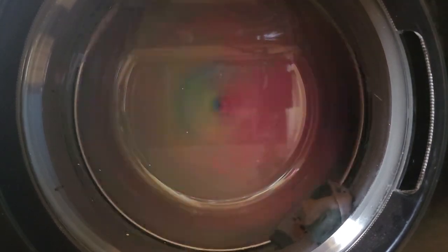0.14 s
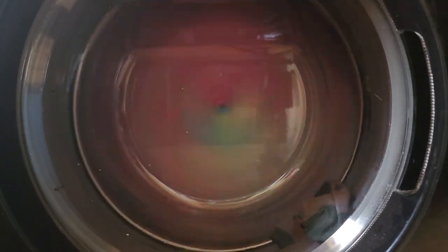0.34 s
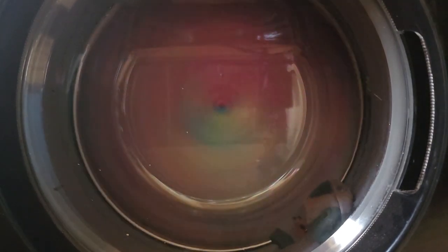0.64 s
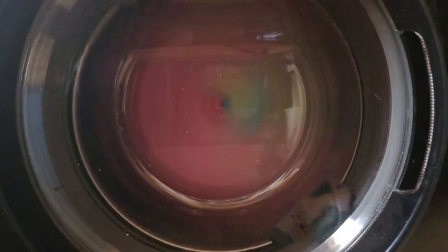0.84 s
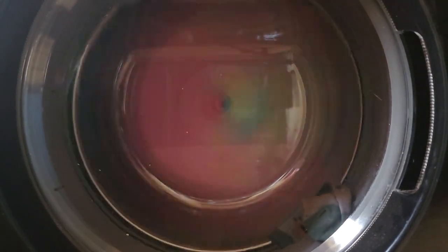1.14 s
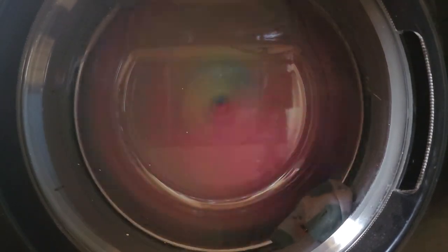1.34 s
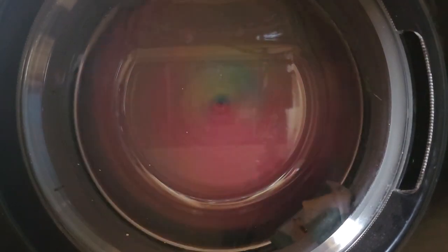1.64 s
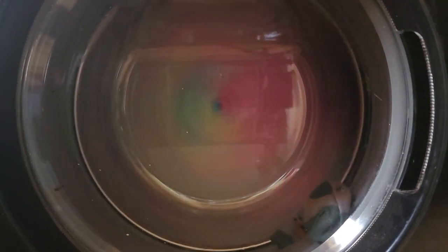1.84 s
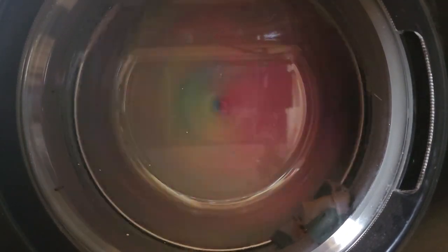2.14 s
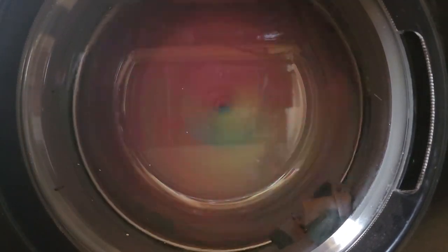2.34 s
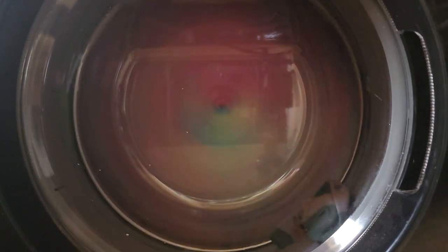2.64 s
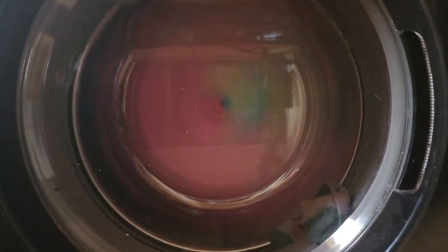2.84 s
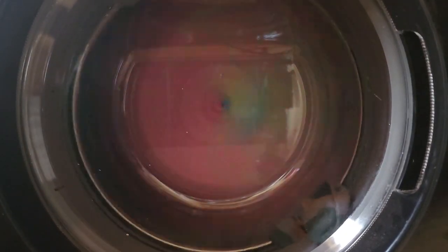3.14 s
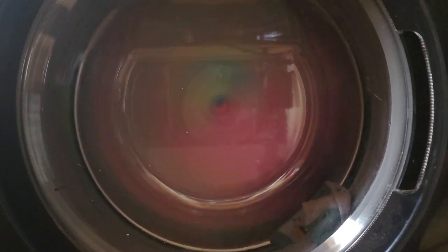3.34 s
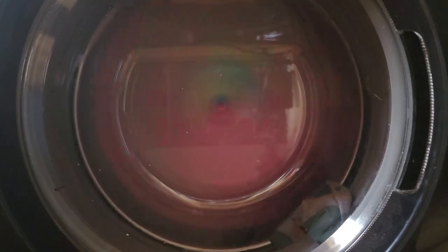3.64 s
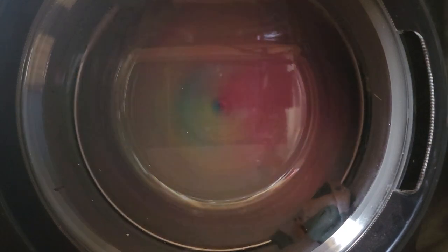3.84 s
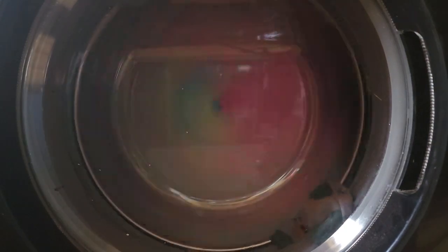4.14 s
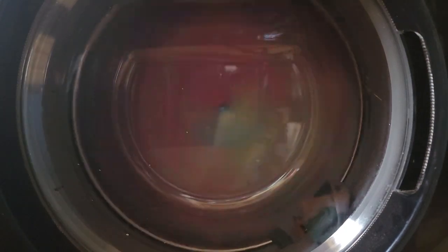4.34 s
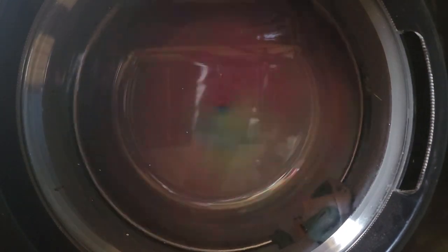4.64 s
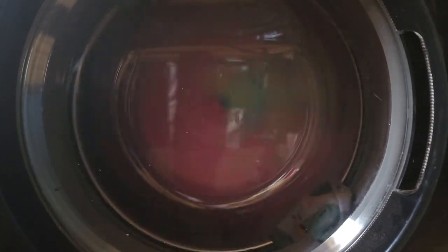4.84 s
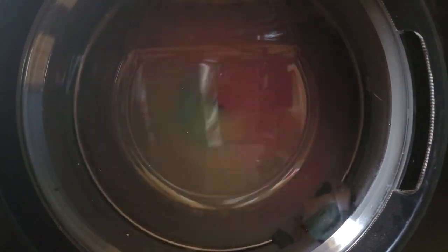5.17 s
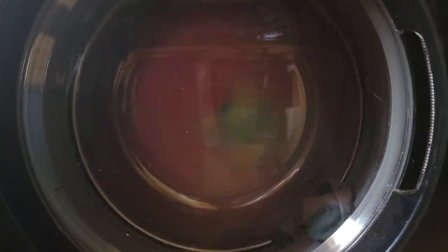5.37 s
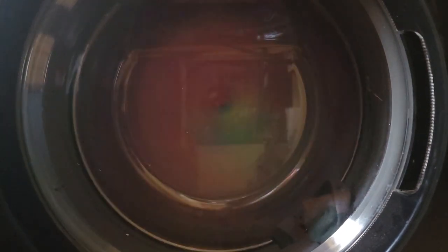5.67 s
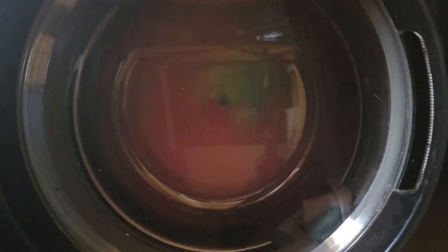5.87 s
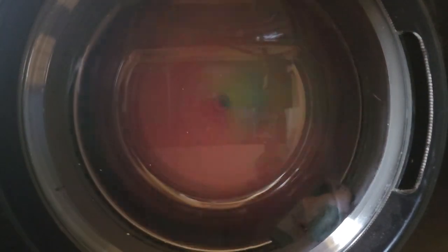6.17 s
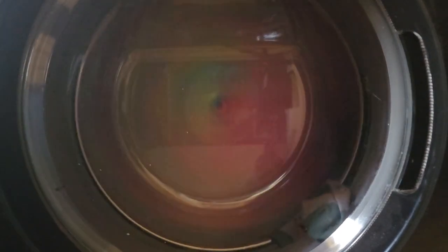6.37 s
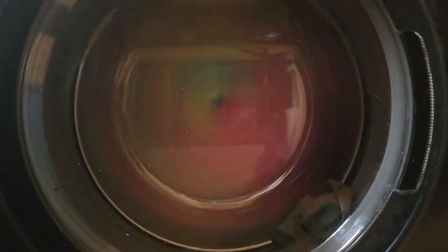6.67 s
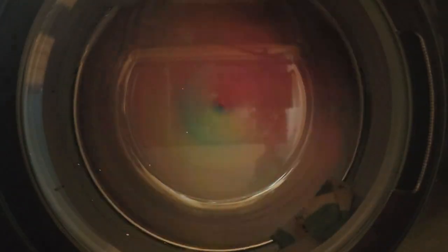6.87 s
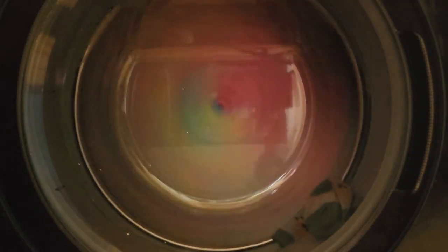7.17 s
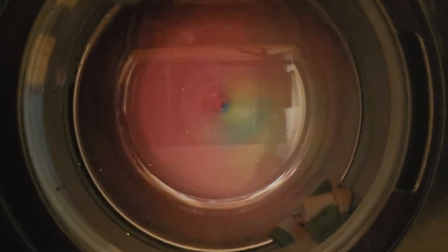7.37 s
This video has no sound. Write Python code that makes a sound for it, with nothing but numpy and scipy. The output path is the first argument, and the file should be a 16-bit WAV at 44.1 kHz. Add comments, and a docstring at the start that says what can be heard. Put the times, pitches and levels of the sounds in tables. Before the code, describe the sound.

Close up, a washing machine on full spin drones low and loud, with fainter grinding, buzzing and a high pulsing whine.

```python
"""The cabinet of a front-loading washing machine throbs at top spin, heard close to the door.
The unbalanced load forces it once a turn, and a resonance near the seventh harmonic gives a deep hum.
Rolling contact in the worn drum bearing excites the tub and panels, which grind and howl.
Behind these, the belt-driven motor adds the hiss and buzz of its sliding brushes
and the thin, pulsing whine of its commutator."""
import sys
import numpy as np
from scipy import signal
from scipy.fft import rfft, irfft
from scipy.io import wavfile

SR = 44100
rng = np.random.default_rng(int(sys.argv[2]) if len(sys.argv) > 2 else 0)


def transcribe(signal):
    """Save signal, clipped to [-1, 1], as a 16-bit WAV file at the path in sys.argv[1]."""
    frames = np.atleast_2d(signal).T
    limited = np.clip(frames, -1, 1)
    pcm = np.round(limited * 32767).astype(np.int16)
    wavfile.write(sys.argv[1], SR, pcm)


N = 331191
TIME = np.arange(N) / SR

DRUM_HZ, MOTOR_HZ = 16.5192, 192.56  # rates of rotation
OUTER_RACE_HZ, INNER_RACE_HZ = 59.93, 88.75  # ball-pass frequencies
BOOM_HZ, BOOM_WIDTH_HZ, BOOM_GAIN = 115.4, 4.5, 6  # the cabinet's main resonance
COMMUTATOR_BARS = 18

# Likeness of the sound at the two microphones: f/Hz, correlation
COHERENCE = [(30, -0.5), (150, 0.46), (300, 0.96), (600, 0.65), (1200, 0.5), (2500, 0.3), (5000, -0.05),
             (15000, -0.2)]
# Left minus right: f/Hz, level difference/dB
BALANCE = [(100, 1.9), (400, 1.3), (600, 1), (950, 3.5), (1300, 0.5), (3000, 1.9), (6500, 0), (8600, 5.5),
           (9500, -4), (11500, -3), (13000, 2), (15500, 3)]
# Commutator harmonics: left level/dB, right level/dB, throb depth, throb phase/turns, half-turn depth
WHINE_TONES = [(-39.2, -37, 0.18, 0.9, 0.23), (-34.5, -41.5, 0.04, 0.77, 0.18), (-41, -36, 0.08, 0.4, 0.22),
               (-38.8, -54, 0.2, 0.56, 0.12)]
# Response of each commutator harmonic to the treble level: slope/(dB per dB)
WHINE_SLOPES = [0.38, 0.62, 1.1, 1.1]
# Random fading of the whine, stronger later on: t/s, depth/dB
WHINE_FADING = [(2.5, -0.1), (4.5, 0.5)]
# Swells and sags of single whine tones: t/s, harmonic number, half-width/s, lift/dB
WHINE_SWELLS = [(2.4, 3, .7, 2.5), (2.97, 1, 0.083, 4.5), (3.22, 1, .1, 3), (3.62, 3, 0.13, 3.2),
                (3.97, 1, .07, 4), (4.2, 3, 0.57, 2.5), (4.77, 1, .15, 8), (5.13, 1, .07, -2),
                (5.333, 1, .07, 6), (5.5, 4, .6, -3), (5.945, 1, 0.26, 5), (6.25, 2, 0.34, 2),
                (6.354, 1, .05, 2.5), (6.42, 4, .14, 2.5), (6.645, 1, .07, 6.5), (7.48, 1, 0.13, 4.5)]
# Level of the treble, which hiss, buzz and whine follow; it eases after about 4 s: t/s, relative level/dB
TREBLE_LEVEL = [(0, -42.8), (3.6, -43), (4.4, -44.4), (7.5, -44.5)]
# Prominent harmonics of the motor shaft: harmonic number, left level/dB, right level/dB
SHAFT_TONES = [(17, -47.4, -50.6), (19, -59, -57), (20, -43.6, -51), (22, -46.6, -61), (23, -57, -51.6),
               (24, -67, -65), (25, -46.6, -82), (26, -48, -60), (27, -64, -50), (28, -49, -66),
               (32, -51, -73), (33, -54, -60), (34, -45, -47), (35, -63.4, -48), (37, -53, -44.5),
               (38, -46.5, -44.5), (39, -51, -45), (40, -55, -60), (41, -53, -53), (43, -58, -62),
               (44, -45.5, -58), (46, -50.6, -55), (49, -56.6, -50.9), (55, -46, -75), (59, -46, -50.5),
               (62, -59, -47), (63, -62, -64), (64, -47, -57)]
# Envelope of the other shaft harmonics: f/Hz, level/dB
SHAFT_ENVELOPE = [(2500, -42), (4000, -53), (6000, -59), (9500, -90), (12000, -63), (15500, -59.5)]
# Broadband rush of bearing, air and brushes: f/Hz, spectral density level/dB
RUSH_SPECTRUM = [(20, -70), (50, -78), (100, -55), (200, -63), (350, -55.5), (530, -64.5), (750, -58),
                 (1100, -53.5), (1650, -62.5), (2400, -68.5), (4000, -78), (7000, -80), (9700, -82.5),
                 (15500, -76)]
# Resonances of tub and panels: f/Hz, bandwidth/Hz, lift/dB
PANEL_MODES = [(270.8, 14.7, 7), (442, 27, 8.5), (603.4, 29, 6.5), (969, 95, 5.5), (1170, 30, 8),
               (1314, 32, 10.5), (1477, 59, 12), (1835, 134, 8.5), (1950, 120, 3), (2174, 133, 10),
               (2559, 48, 10), (2990, 230, 3.5), (3400, 600, 7), (7550, 2400, 5)]
# Grinding of the bearing, which its tones, rush and howl follow: t/s, relative level/dB
GRINDING_LEVEL = [(0, -19), (1.5, -18.5), (4.2, -19.0), (4.8, -21), (5.45, -19), (7.5, -20)]
# Brief flares of the bearing: t/s, grinding lift/dB, howl lift/dB
BEARING_FLARES = [(0.079, 1.5, 5), (0.69, 1, 2), (1.54, 2.5, 1), (1.89, 0, 11), (2.82, 1.5, 7),
                  (3.18, 0, 8), (3.84, 2.5, 0), (4.07, -1, 12.5), (5.89, 1, 3), (6.19, 1.5, 11),
                  (6.43, -0.5, 6.5)]
# Tones of the drum bearing: f/Hz, left level/dB, right level/dB
BEARING_TONES = [(851.9, -34.5, -37.6), (890.3, -36.1, -36.2), (1018.8, -41.0, -37.1),
                 (1051.1, -36.6, -49.5), (1081.4, -34.2, -45.0), (1090.8, -41.4, -37.8),
                 (1121.7, -34.1, -38.3), (1138.6, -35.1, -38.4), (1154.0, -33.8, -29.1),
                 (1165.5, -36.6, -52.1), (1198.5, -43.0, -39.0), (1226.0, -36.8, -39.3),
                 (1242.2, -35.9, -34.8), (1258.3, -40.8, -40.9), (1291.3, -42.6, -45.3),
                 (1301.4, -34.2, -31.4), (1314.9, -38.0, -40.9), (1318.2, -43.1, -33.6),
                 (1331.0, -34.4, -36.9), (1347.8, -36.1, -40.2), (1419.8, -38.1, -41.7),
                 (1436.7, -37.4, -45.0), (1464.9, -39.5, -40.3), (1497.9, -32.7, -39.5),
                 (1508.7, -33.1, -40.3), (1525.5, -37.8, -34.9), (1763.7, -44.2, -42.0),
                 (1797.3, -40.7, -46.9), (1841.1, -42.9, -40.8), (1857.2, -37.4, -42.1),
                 (1880.1, -44.9, -46.7), (1960.9, -43.3, -44.3), (1968.9, -45.2, -45.7),
                 (2020.8, -44.6, -50.8), (2207.8, -43.3, -54.6), (2218.6, -45.5, -49.5)]
# Low resonances of the sprung tub and the cabinet: f/Hz, bandwidth/Hz
SUSPENSION_MODES = [(24, 3.3), (58, 2.5), (75, 2.4)]
# Slight rise and fall of the hum: t/s, relative level/dB
HUM_LEVEL = [(0, -13), (0.75, -13), (2.35, -13), (3.8, -12.6), (4.4, -13), (5.55, -13), (6.1, -13),
             (6.65, -13.5), (7.5, -13)]
# Cabinet vibration at 1, 2, 3, ... times the drum frequency: level/dB
HUM_HARMONICS = [-49.7, -39.7, -36, -33.9, -35.1, -29.9, -13.8, -36.9, -31.2, -44, -40, -43, -41, -45, -45,
                 -46, -47, -49, -41, -50, -49, -45, -42, -46, -47, -54, -42, -52, -47]


def amp(db):
    """Amplitude ratio of a level in decibels."""
    return 10 ** (np.asarray(db) / 20)


def unit_rms(x):
    """Normalisation to a mean square of 1."""
    return x / np.sqrt(np.mean(np.abs(x) ** 2) + 1e-20)


def spectrum_at(points, hz):
    """Interpolation of a spectrum on a logarithmic frequency axis."""
    f, value = np.transpose(points)
    return np.interp(np.log(hz + 1), np.log(f + 1), value)


def envelope(table):
    """Amplitude envelope of rms 1 from a curve of level against time."""
    return unit_rms(amp(np.interp(TIME, *np.transpose(table))))


def bump(centre_s, half_s):
    """Gaussian pulse of height 1."""
    return np.exp(-((TIME - centre_s) / half_s) ** 2)


def wander(cutoff_hz):
    """Random modulation: low-pass noise of rms 1."""
    steps = np.linspace(0, N / SR, 2048)
    hz = np.fft.rfftfreq(len(steps), steps[1])
    slow = irfft(rfft(rng.standard_normal(len(steps))) / (1 + (hz / cutoff_hz) ** 4))
    return np.interp(TIME, steps, unit_rms(slow))


def stereo_phasors(hz):
    """Partial coherence: random left and right phases that agree best in the low midrange."""
    spread = np.sqrt(-2 * np.log(np.clip(spectrum_at(COHERENCE, hz), .01, 1)))
    common = 2 * np.pi * rng.random(len(hz))
    difference = spread * rng.standard_normal(len(hz))
    return np.exp(1j * (common + np.outer([0, 1], difference)))


def stereo_gains(hz):
    """Level difference between the microphones, favouring the left at most frequencies."""
    return amp(np.outer([.5, -.5], spectrum_at(BALANCE, hz)))


def periodic(turns, harmonics, size=8192):
    """Fourier synthesis of a wave that repeats every turn, from complex rms amplitudes."""
    shape = irfft(np.r_[0, harmonics], size) * size / np.sqrt(2)
    return np.interp(turns % 1 * size, np.arange(size + 1), np.r_[shape, shape[0]])


def throb(drum, depth, phase_turns, half_turn_depth=0):
    """Amplitude modulation at once and twice the drum frequency."""
    angle = 2 * np.pi * (drum - phase_turns)
    return unit_rms(1 + depth * np.cos(angle) + half_turn_depth * np.cos(2 * angle))


def commutator_whine(drum, motor, treble_level, flutter=0.21, flutter_hz=22, doppler_rad=0.13, fade_hz=4.1):
    """Periodic contact of bars and brushes gives four high harmonics, which throb with the drum."""
    out = np.zeros((2, N))
    fade_db = np.interp(TIME, *np.transpose(WHINE_FADING))
    surge = throb(drum, depth=0.38, phase_turns=0.66)  # the swells, too, pulse with the drum
    for k, (left_db, right_db, *throb_shape) in enumerate(WHINE_TONES, 1):
        angle = 2 * np.pi * COMMUTATOR_BARS * k * motor
        swell_db = sum(db * bump(t, half_s) for t, number, half_s, db in WHINE_SWELLS if number == k)
        size = throb(drum, *throb_shape) * treble_level ** WHINE_SLOPES[k - 1] * amp(swell_db * surge)
        for side, db in enumerate([left_db, right_db]):
            # Doppler effect: the motor rocks towards one microphone and away from the other
            path_rad = side * np.pi / 2 + (2 * side - 1) * doppler_rad * k * np.cos(2 * np.pi * drum)
            tone = np.sin(angle + path_rad + flutter * wander(flutter_hz))
            fade = amp(fade_db * wander(fade_hz))
            flicker = 1 + flutter * wander(flutter_hz)
            out[side] += amp(db) * unit_rms(size * fade * tone * flicker)
    return out


def brush_buzz(drum, motor, treble_level, sway=0.57, half_sway=0.2, shiver=0.56, shiver_hz=17, gain_db=-1.76):
    """Brush chatter repeats each shaft turn: a harmonic series, modulated as the tub rocks."""
    hz = MOTOR_HZ * np.arange(1, 82)
    heights = amp(spectrum_at(SHAFT_ENVELOPE, hz)) * stereo_gains(hz) * (hz > 2500)
    for number, left_db, right_db in SHAFT_TONES:
        heights[:, round(number) - 1] = amp([left_db, right_db])
    heights[:, COMMUTATOR_BARS - 1::COMMUTATOR_BARS] = 0  # these harmonics belong to the whine
    angle = 2 * np.pi * drum
    weights = [np.ones(N), sway * np.cos(angle), sway * np.sin(angle),
               half_sway * np.cos(2 * angle), shiver * wander(shiver_hz)]
    out = np.zeros((2, N))
    for weight in weights:  # each has its own phases, so interference shifts the timbre
        out += weight * np.array([periodic(motor, h) for h in heights * stereo_phasors(hz)])
    weight_rms = np.sqrt(np.square(weights).sum(0).mean())
    return amp(gain_db) * out / weight_rms * treble_level


def grinding_effort(flare_s=0.026, clump_db=0.66, clump_hz=12):
    """Envelope of the bearing's excitation: a slow course, brief flares and small random clumps."""
    flare_db = sum(db * bump(t, flare_s) for t, db, _ in BEARING_FLARES)
    return envelope(GRINDING_LEVEL) * amp(flare_db + clump_db * wander(clump_hz))


def rolling_force(drum, rate_hz, cutoff_hz=2600, scatter_db=4):
    """Periodic forcing by a bumpy track: a line spectrum lying above the harmonics of the hum."""
    hz = rate_hz * np.arange(1, 4000 // rate_hz)
    heights = stereo_phasors(hz) * unit_rms(amp(scatter_db * rng.standard_normal(len(hz))))
    heights *= np.sqrt(2 * rate_hz / SR)  # the power density of unit white noise
    band = (hz > len(HUM_HARMONICS) * DRUM_HZ) / (1 + (hz / cutoff_hz) ** 8)
    return np.array([periodic(drum * rate_hz / DRUM_HZ, h) for h in heights * band])


def friction_rush(drum, motor, effort, treble_level, outer_db=-9, inner_db=-6, tub_db=-7, scrape=0.33):
    """Source and filter: bearing roughness and brush friction excite the modes of tub and panels."""
    hz = np.fft.rfftfreq(N, 1 / SR)
    left, independent = rfft(rng.standard_normal((2, N)))
    coherence = np.clip(spectrum_at(COHERENCE, hz), 0, 1)
    right = coherence * left + np.sqrt(1 - coherence ** 2) * independent
    noise = irfft(np.array([left, right]), N)
    outer = amp(outer_db) * rolling_force(drum, OUTER_RACE_HZ)
    tub = amp(tub_db) * rolling_force(drum, DRUM_HZ)
    inner = amp(inner_db) * rolling_force(drum, INNER_RACE_HZ)
    # the bearing grinds harder as the heavy side of the load comes round
    force = noise + outer + tub + inner * throb(drum, depth=0.34, phase_turns=0.31)
    tub_band = 1 / (1 + (hz / 600) ** 4)  # here the tub booms on its own
    boom = tub_band * rfft(force * throb(drum, depth=0.39, phase_turns=0.8))
    grind = (1 - tub_band) * rfft(force * throb(drum, depth=0.08, phase_turns=0.38) * effort)
    # the brushes scrape in spurts on the high spots of the commutator
    high_spots = unit_rms(periodic(motor, [.3, 1j, 1, .5j]))
    spurts = unit_rms(np.maximum(1 + scrape * high_spots, 0))
    hiss = rfft(noise * spurts * treble_level * throb(drum, depth=0.081, phase_turns=0.81))
    bearing_band = 1 / (1 + (hz / 2800) ** 6)
    source = bearing_band * (boom + grind) + (1 - bearing_band) * hiss
    modes_db = sum(db / (1 + (2 * (hz - f) / width) ** 2) for f, width, db in PANEL_MODES)
    colour = amp(spectrum_at(RUSH_SPECTRUM, hz) + modes_db)
    return irfft(source * colour * stereo_gains(hz), N) * np.sqrt(SR / 2)


def tub_howl(levels_db=(-27, -33), rough=0.39, rough_hz=9, steepness=3.9, surge_db=1.5, surge_hz=3.6):
    """Resonance: the bearing drives one sharp tub mode, which fades as the grinding eases."""
    carrier = np.exp(2j * np.pi * 11 * INNER_RACE_HZ * TIME)
    roughness = 1 + rough * (wander(rough_hz) + 1j * wander(rough_hz))
    flare_db = sum(db * bump(t, half_s=0.029) for t, _, db in BEARING_FLARES)
    drive = envelope(GRINDING_LEVEL) ** steepness * amp(flare_db + surge_db * np.tanh(wander(surge_hz)))
    return np.outer(amp(levels_db), unit_rms((roughness * carrier).real * drive))


def bearing_tones(drum, effort, waver=0.22, waver_hz=2.6):
    """Rolling contact on worn races: tones that waver as the balls slip and surge with the load."""
    hz, *levels_db = np.transpose(BEARING_TONES)
    heights = amp(levels_db) * stereo_phasors(hz)
    out = np.zeros((2, N))
    for f, height in zip(hz, heights.T):
        angle = 2 * np.pi * f * drum / DRUM_HZ + waver * wander(waver_hz)
        size = np.sqrt(2) * unit_rms(1 + waver * wander(waver_hz))
        out += np.outer(height, size * np.exp(1j * angle)).real
    return out * effort * throb(drum, depth=0.12, phase_turns=0.36)


def cabinet_hum(drum, scatter_above_hz=175, right_delay_s=.00007, waver_db=0.36, waver_hz=2):
    """Forced vibration: the unbalanced load shakes the cabinet, which booms on the seventh harmonic."""
    hz = DRUM_HZ * np.arange(1, len(HUM_HARMONICS) + 1)
    # each low resonance delays what lies above it by half a cycle; the boom rings on after each push
    lag_rad = sum(np.pi / 2 + np.arctan(2 * (hz - f) / width) for f, width in SUSPENSION_MODES)
    lag_rad -= np.angle(1 + BOOM_GAIN / (1 + 2j * (hz - BOOM_HZ) / BOOM_WIDTH_HZ))
    # the many panel modes higher up scatter the phases
    phasors = np.where(hz < scatter_above_hz, 1j * np.exp(-1j * lag_rad), stereo_phasors(hz))
    travel = np.exp(-2j * np.pi * np.outer([0, right_delay_s], hz))
    heights = amp(HUM_HARMONICS) * phasors * stereo_gains(hz) * travel
    hum = np.array([periodic(drum, h) for h in heights])
    return hum * envelope(HUM_LEVEL) * amp(waver_db * wander(waver_hz))


def scene(drift=0.000145, drift_hz=0.267, belt_turns=0.0027):
    """Superposition of all sources; drum and motor are angles, in turns, coupled by the belt."""
    drifting_s = TIME + np.cumsum(drift * wander(drift_hz)) / SR
    drum = DRUM_HZ * drifting_s
    # the load tugs the belt once a turn, so the motor's speed ripples
    motor = MOTOR_HZ * drifting_s + belt_turns * np.sin(2 * np.pi * drum)
    effort, treble_level = grinding_effort(), envelope(TREBLE_LEVEL)
    body = cabinet_hum(drum) + bearing_tones(drum, effort) + tub_howl()
    rush = friction_rush(drum, motor, effort, treble_level)
    return body + rush + brush_buzz(drum, motor, treble_level) + commutator_whine(drum, motor, treble_level)


def record(dry, cutoff_hz=15750):
    """Band limiting by a steep linear-phase low-pass filter."""
    lowpass = signal.firwin(1023, cutoff_hz, window=("kaiser", 9), fs=SR)
    return signal.oaconvolve(dry, lowpass[None], "same")


dry = scene()
out = record(dry)
transcribe(out)
```